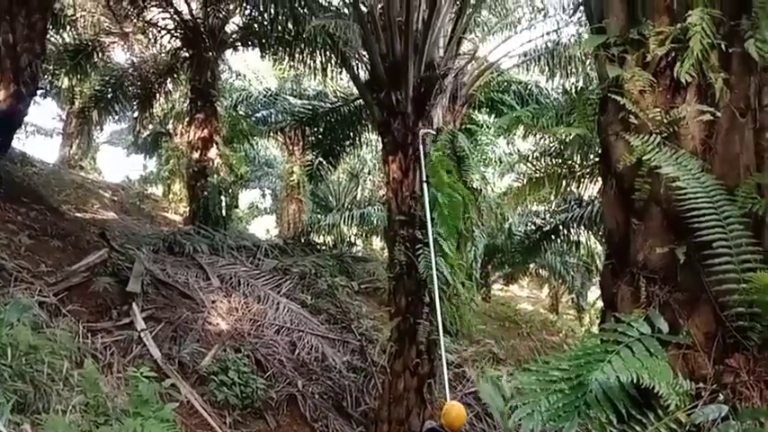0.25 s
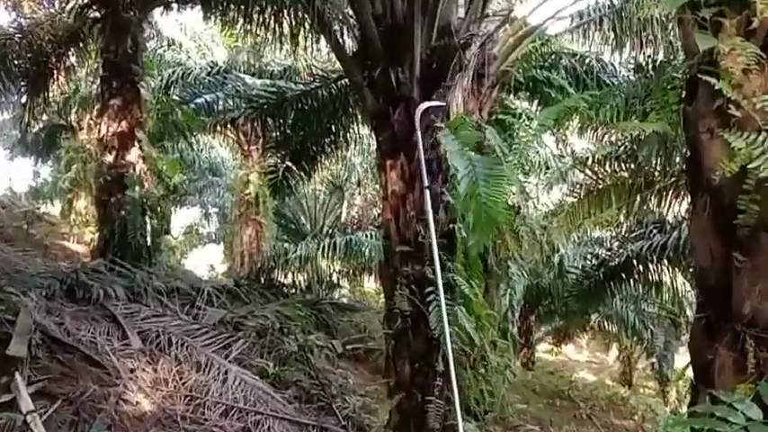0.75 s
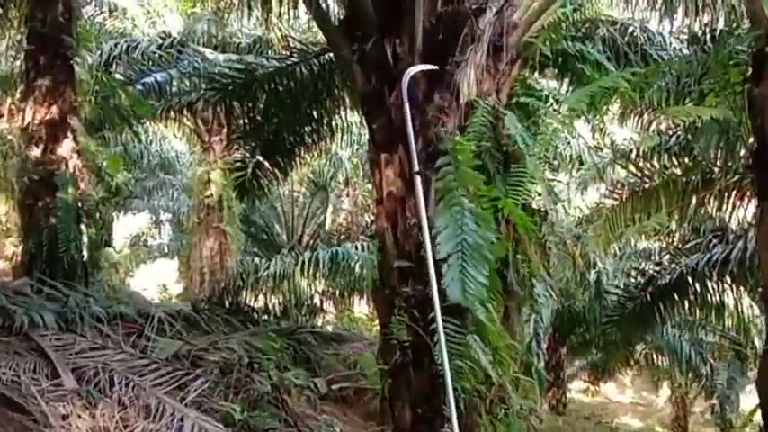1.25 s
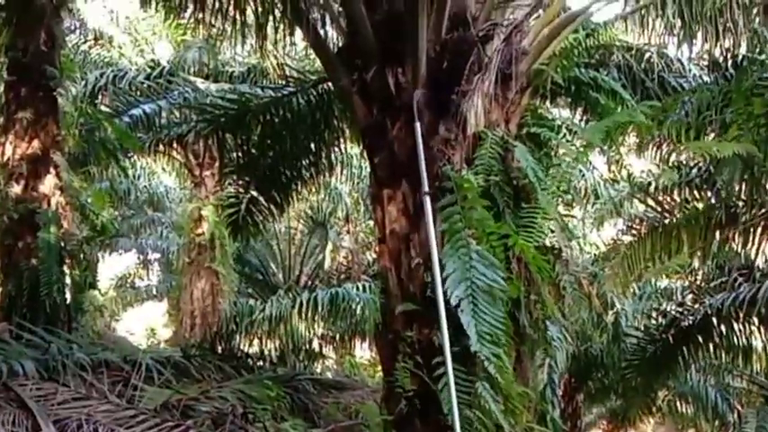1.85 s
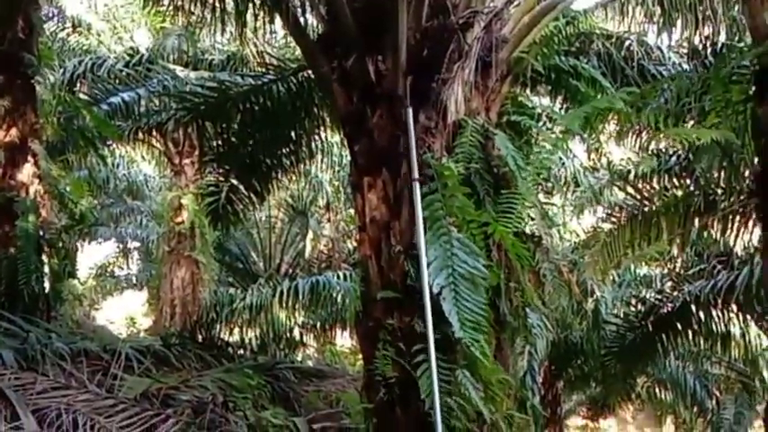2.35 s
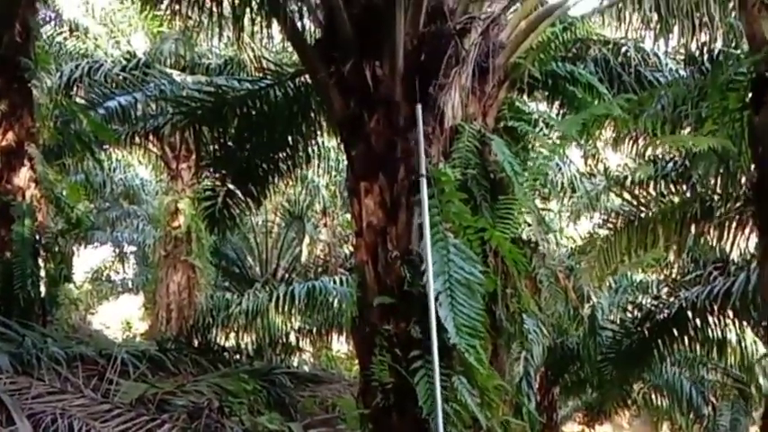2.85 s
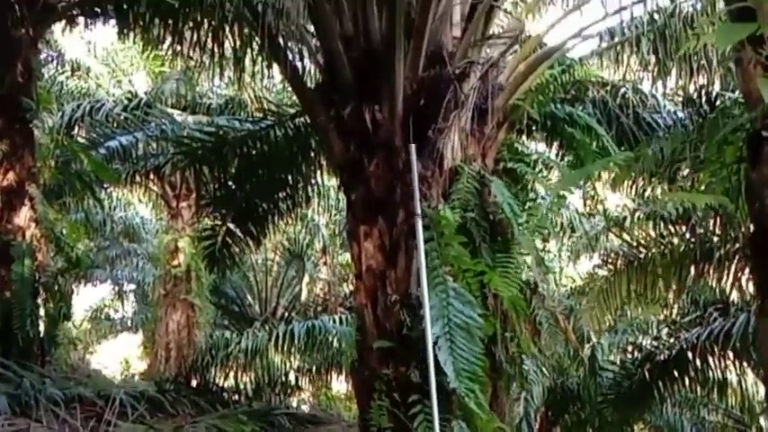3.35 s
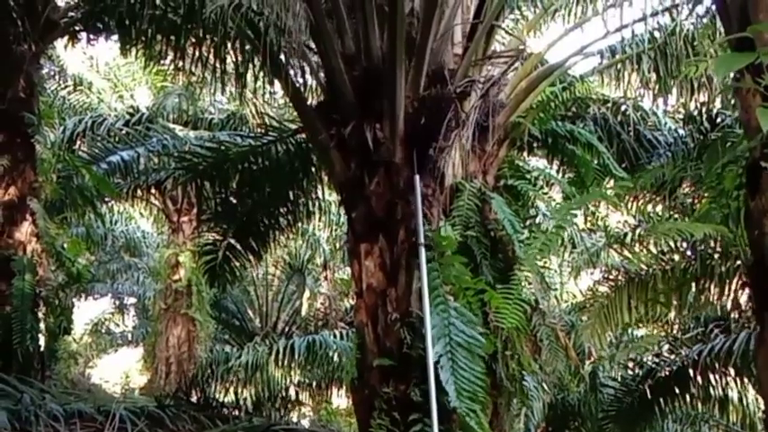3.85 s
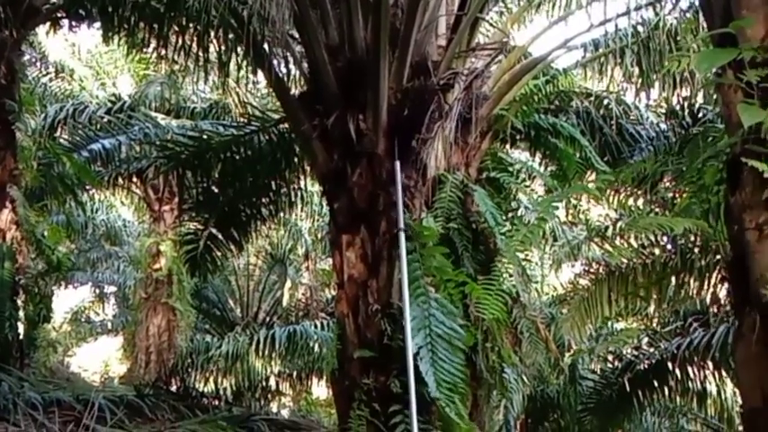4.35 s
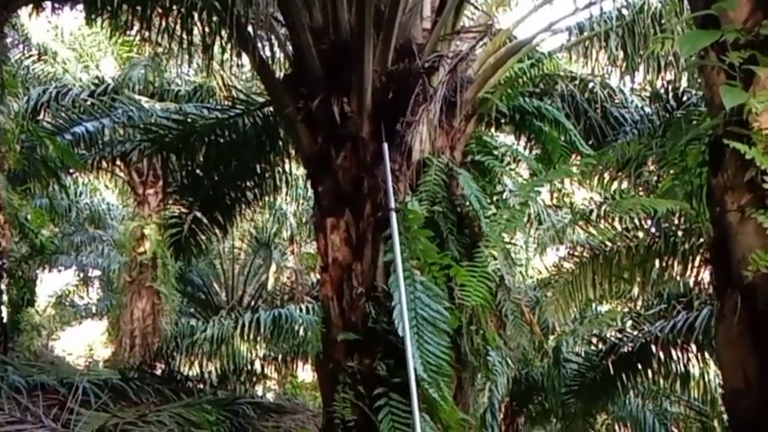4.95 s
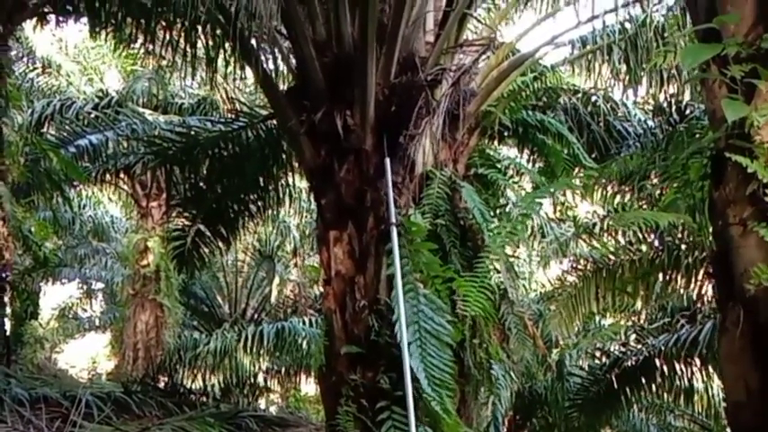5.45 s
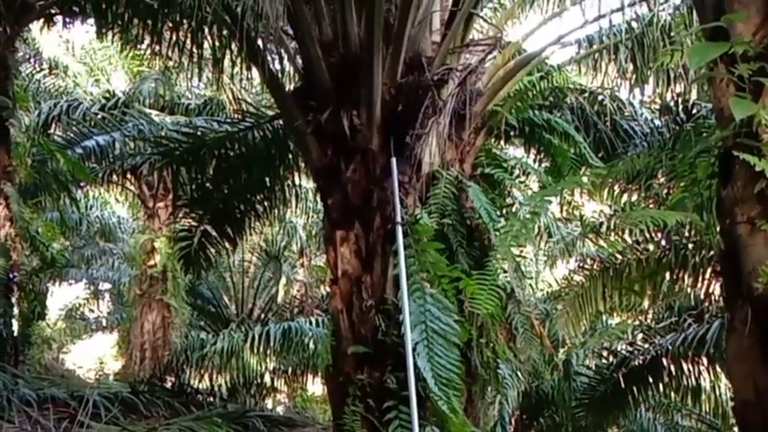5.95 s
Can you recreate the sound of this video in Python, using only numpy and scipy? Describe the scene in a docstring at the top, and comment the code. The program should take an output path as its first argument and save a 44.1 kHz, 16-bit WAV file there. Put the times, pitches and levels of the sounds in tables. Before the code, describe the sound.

Continuous bright insect noise surrounds a handheld microphone among palms: distant cicadas merged into a buzzing hiss, fast cricket trills and thin high rasping. Dry frond rustles open, fade into a lull, then resume irregularly with woody knocks and brittle snaps. A closer cicada pulses ever faster from the lull onward. Faint rumble lies below, the grove adds a short diffuse tail, and one last light rustle comes near the end.

```python
"""Throughout, clicks of buckling tymbals blur into the drone of two far cicada swarms over a faint rumble of
filtered noise; file-and-scraper crickets trill and a katydid's noise rasp fades in. At first someone's long
pole strokes dry palm fronds: fractures rustle, stalks knock as damped resonances, brushed leaves hiss. In the
lull that follows a gliding tone chirps (1.6 s) and a nearer cicada rises, throbbing ever faster. From 2.1 s
the strokes return, the rumble swells slightly near 2.5 s, leaflets snap as noise bursts; a stroke ends it."""
import sys
import numpy as np
from scipy import signal
from scipy.fft import rfft, irfft, next_fast_len
from scipy.io import wavfile
from scipy.ndimage import uniform_filter1d, map_coordinates

SR = 44100
rng = np.random.default_rng(int(sys.argv[2]) if len(sys.argv) > 2 else 0)


def generate_wav(sig):
    """Save sig (samples, or channels by samples) to the path in sys.argv[1] as 16-bit PCM at SR."""
    pcm = np.round(np.clip(np.atleast_2d(sig).T, -1, 1) * 32767).astype(np.int16)
    wavfile.write(sys.argv[1], SR, pcm)


N = 274302
T = np.arange(N) / SR  # time [s]

# Spectrum of the ground rumble: f/Hz, relative level/dB
RUMBLE_SPECTRUM = [(20, -5), (45, -13), (70, -11), (95, -3), (135, -1.5), (200, -6), (320, -12), (700, -17),
                   (1200, -12), (2500, -41)]
# Spectrum of brushed and swaying foliage: f/Hz, relative level/dB
FOLIAGE_SPECTRUM = [(300, -23), (600, -9), (1150, -7), (1450, 6), (2100, 0), (2800, -3.5), (3450, -1),
                    (4200, -6), (8000, -10.5), (10200, -5), (11200, -16), (15000, -1.5)]
# Level of the brushed-leaf hiss, which dies away early on: t/s, level/dB
FOLIAGE_LEVEL = [(0, -49), (.45, -62), (1.08, -70), (1.14, -63.5), (1.35, -63.5), (1.6, -71.5),
                 (2.2, -75.5), (6.2, -79)]
# Body resonance of the lower far cicadas: f/Hz, relative level/dB
LOW_SWARM_SPECTRUM = [(3900, -78), (4450, -40), (4680, -24.5), (4850, -12.5), (5100, -5.5), (5400, 1.5),
                      (5700, 0), (6050, -2.5), (6300, -14), (7000, -34.5), (8000, -82)]
# Body resonance of the higher far cicadas: f/Hz, relative level/dB
HIGH_SWARM_SPECTRUM = [(4500, -73.5), (5900, -9), (6400, -4), (6600, -3), (6850, 0.5), (7300, -4.5),
                       (7650, -15.5), (8000, -24.5), (8600, -34.5), (10300, -37), (11200, -50)]
# Level of the higher swarm: t/s, level/dB
HIGH_SWARM_LEVEL = [(0.1, -43.5), (1.39, -44), (1.92, -45.5), (2.5, -42.5), (3.78, -43.5), (6.1, -43.5)]
# Body resonance of the near cicada: f/Hz, relative level/dB
NEAR_CICADA_SPECTRUM = [(4000, -86), (4650, -33), (4850, -2.5), (5150, -1.5), (5400, 8.5), (5650, 3),
                        (6000, -14), (6400, -17), (7500, -68)]
# Effort of the near cicada, which joins in late: t/s, level at the top of a throb/dB
NEAR_CICADA_EFFORT = [(1.8, -58), (1.95, -44), (3.4, -46.5), (3.8, -41.5), (4.8, -39.5), (6.2, -42.5)]
# Pitches of two crickets, each taken a fifth of the way through a wing stroke: t/s, first f/Hz, second f/Hz
CRICKET_PITCHES = [(0, 6020, 5960), (1.5, 6170, 5950), (2.4, 6045, 5950), (3.1, 5950, 5930),
                   (3.7, 6010, 5950), (4.4, 6146, 5900), (5.2, 6086, 5885), (6.2, 6150, 5840)]
# Spectrum of the farther crickets' rasp: f/Hz, relative level/dB
FAR_CRICKET_SPECTRUM = [(11000, -40), (11450, -11.5), (11800, -9), (12200, 2.5), (12450, -15.5),
                        (12900, -24.5)]
# Spectrum of the katydid's rasp: f/Hz, relative level/dB
KATYDID_SPECTRUM = [(11500, -54), (12500, -13.5), (13200, -5.5), (13800, 2), (14200, -1), (14700, 3),
                    (15050, -13), (15500, -4)]
# Level of the katydid: t/s, level/dB
KATYDID_SWELL = [(.05, -68), (.38, -57.5), (1.75, -59), (1.85, -61), (1.95, -58.5), (3.8, -60), (4.95, -60),
                 (5.2, -63.5), (6.15, -62)]
# A lone short call: t/s, f at its middle/Hz, peak level/dB
LONE_CHIRP = [(1.568, 4745, -52)]
# Strokes through dry fronds: t of the crest/s, rise time/s, stalk level/dB, leaflet level/dB, tip level/dB
FROND_STROKES = [(.01, 0.016, -52, -65, -70), (0.082, 0.022, -51.5, -48, -71), (0.16, 0.039, -55, -57, -72),
                 (0.272, 0.058, -63, -62, -67), (0.434, .04, -70.5, -64, -62),
                 (0.758, 0.052, -60.5, -59, -60.5), (2.156, 0.022, -53.5, -62, -64),
                 (2.231, 0.011, -55, -67, -85), (2.376, 0.015, -66, -74, -79),
                 (2.548, 0.013, -59, -64, -61), (2.57, .009, -58, -44, -54), (2.669, 0.03, -54, -60.5, -67),
                 (2.939, 0.044, -60, -65.5, -70), (3.124, 0.041, -60, -56.5, -63),
                 (3.186, 0.02, -57.5, -49, -57.5), (3.294, 0.016, -70, -52, -63),
                 (3.361, 0.014, -63, -62, -65), (3.489, 0.034, -63.5, -61, -71),
                 (3.565, 0.018, -81, -63.5, -64), (3.71, 0.036, -57, -56, -66),
                 (3.846, .023, -53.5, -56.5, -66), (3.929, 0.012, -56, -54.5, -57),
                 (4.459, 0.022, -51, -51, -64), (4.581, 0.01, -55.5, -58, -72),
                 (4.649, 0.039, -54, -52, -63), (4.869, 0.026, -44.5, -49, -61.5),
                 (5.056, 0.037, -54, -52.5, -65), (5.645, .016, -69, -66.5, -88)]
# Spectrum of fracturing stalks: f/Hz, relative level/dB
STALK_SPECTRUM = [(200, -23), (380, -11.5), (520, -6), (620, -6), (760, 2), (900, 1), (1050, -6.5),
                  (1220, 3.5), (1450, 1.5), (2000, -37)]
# Spectrum of fracturing leaflets: f/Hz, relative level/dB
LEAFLET_SPECTRUM = [(900, -20), (1400, -6), (1650, -0.5), (1790, -3.5), (2000, 5), (2340, 2.5),
                    (2680, -4.5), (2920, -1.5), (3300, -11), (3650, -14), (4100, -20), (5600, -33)]
# Spectrum of the brittle leaflet tips: f/Hz, relative level/dB
TIP_SPECTRUM = [(3000, -46), (4400, 6.5), (5500, -10), (8500, 0.5), (10400, 5), (11300, -8), (15000, -27)]
# Modes of the long pole that the fronds scrape along: f/Hz, level/dB, t60/s
POLE_MODES = [(897, -5, .12), (1310, -13, 0.22), (2060, -4, 0.24), (2660, -17, 0.22), (3420, -5, .2)]
# The clearest knocks on stalks and ground: t/s, f/Hz, peak level/dB
STALK_KNOCKS = [(.15, 750, -57), (0.757, 1100, -44), (.785, 950, -51), (2.14, 424, -51), (2.165, 950, -48),
                (2.335, 119, -56), (2.567, 1642, -39), (2.59, 215, -49), (2.62, 120, -61.5),
                (2.935, 830, -50.5), (3.088, 900, -49), (3.203, 1180, -48), (3.287, 1300, -45),
                (3.303, 1200, -47), (3.35, 252.5, -53.5), (3.698, 900, -43.5), (3.838, 772, -44.5),
                (4.403, 900, -50.5), (4.435, 900, -41.5), (4.459, 850, -39), (4.468, 409.6, -48.5),
                (4.495, 240, -57), (4.59, 2350, -48.5), (4.867, 426, -46), (4.887, 218, -53.5),
                (4.999, 800, -44), (5.054, 2053, -43.5), (5.085, 229, -56), (5.64, 1100, -56.5)]
# Leaflets breaking: t/s, level at the onset/dB
LEAFLET_SNAPS = [(2.562, -43), (3.127, -49), (3.171, -35.5), (3.198, -38), (3.576, -63), (3.824, -60),
                 (3.923, -58)]
# Spectrum of a breaking leaflet: f/Hz, relative level/dB
SNAP_SPECTRUM = [(900, -33), (2000, -26), (3600, -8), (5500, 8.5), (8000, -6), (10500, -14.0),
                 (12000, -14), (15000, -22)]

# The rumble swells while the weight shifts: resting level, rise [dB]; moment, width [s]
RUMBLE_DB, RUMBLE_RISE_DB, RUMBLE_PEAK_S, RUMBLE_SPAN_S = -81, 3, 2.5, .45
LOW_SWARM_DB = -39  # the lower swarm has no slow level curve
# One crest [s], throbs a second there, gain in rate a second; share of amplitude lost between throbs
THROB_AT_S, THROB_RATE, THROB_SPEEDUP, THROB_DEPTH = 3.94, 5.337, .279, 0.78
RASP_START_DB, RASP_FADE_DB_PER_S = -66.5, 0.34  # the crickets' overtones
FALL_RATIO, FALL_SHAPE = 1.18, 1.33  # a stroke's release over its rise; shape 1 is exponential
SWAY_DB, SWAY_S = -4, 0.034  # swaying foliage: level over the tips', time to settle
# Contact time [s] at a reference pitch [Hz]; lower, heavier parts stay in touch longer
CONTACT_S, CONTACT_HZ, CONTACT_LAW = 0.0084, 895, 0.3
SNAP_T60_S = .017
TOP_HZ = 15520


def amp(db):
    """Logarithmic level: decibels to amplitude gain."""
    return 10 ** (np.asarray(db) / 20)


def unit(x):
    """Power normalisation: scale to rms 1."""
    return x / np.sqrt(np.mean(x ** 2) + 1e-20)


def curves(rows):
    """Linear interpolation: one value per sample for each column after the time."""
    s, *cols = np.transpose(rows)
    return [np.interp(T, s, c) for c in cols]


def wobble(rate):
    """Slow random fluctuation: a smooth curve through rate random knots a second."""
    knots = rng.standard_normal(int(N * rate / SR) + 4)
    return map_coordinates(knots, [T * rate])


def filtered(x, response):
    """Linear filtering: the spectrum of x times a response of frequency."""
    size = next_fast_len(N + SR // 2)
    spectrum = rfft(x, size) * response(np.fft.rfftfreq(size, 1 / SR))
    return irfft(spectrum, size)[:N]


def coloured(x, spectrum):
    """Spectral shaping: x through points of (f/Hz, level/dB), at rms 1."""
    f, db = np.transpose(spectrum)

    def response(hz):
        return amp(np.interp(np.log(hz + 1), np.log(f), db, left=-120))
    return unit(filtered(x, response))


def cycles(rate, drift):
    """Phase accumulation: cycles counted by an oscillator whose rate drifts slightly."""
    return np.cumsum(rate * (1 + drift * wobble(4))) / SR + rng.random()


def swell(t, rise, fall, shape):
    """Transient envelope: a rounded rise to 1 at t = 0, then a stretched-exponential release."""
    return np.where(t < 0, np.exp(-(t / rise) ** 2), np.exp(-np.abs(t / fall) ** shape))


def grove(x, wet_db, t60):
    """Diffuse scattering: direct sound plus a decaying noise tail from trunks and crowns."""
    t = T[:SR // 2]
    tail = rng.standard_normal(len(t)) * amp(-60 * t / t60)
    return x + amp(wet_db) * signal.fftconvolve(x, tail / np.linalg.norm(tail))[:N]


def crackle(spectrum, density):
    """Poisson-like impulse noise: dry clicks of uneven size at random moments, density a second."""
    clicks = (rng.random(N) < density / SR) * rng.standard_normal(N)
    return coloured(clicks, spectrum)


def air():
    """Broadband noise: a faint low rumble throughout and the impulsive hiss of brushed foliage."""
    leaf_db, = curves(FOLIAGE_LEVEL)
    rumble_db = RUMBLE_DB + RUMBLE_RISE_DB * np.exp(-((T - RUMBLE_PEAK_S) / RUMBLE_SPAN_S) ** 2)
    rumble = amp(rumble_db + 2.0 * wobble(15)) * coloured(rng.standard_normal(N), RUMBLE_SPECTRUM)
    hiss = amp(leaf_db + 1.0 * wobble(45)) * crackle(FOLIAGE_SPECTRUM, density=9000)
    return rumble + hiss


def tymbals(click_rate, count):
    """Snap-through buckling: each cicada clicks at its own rate and with uneven force."""
    clicks = np.zeros(N)
    for _ in range(count):
        own_rate = click_rate * np.exp(.3 * rng.standard_normal())
        turns = np.floor(cycles(own_rate, drift=.04))
        clicks += np.diff(turns, prepend=turns[0]) * rng.standard_normal(N)
    return unit(clicks)


def swarm(song, click_rate, blur_db, count):
    """Source and resonator: clicks ring the insects' bodies; distance smears much of them into hiss."""
    blur = amp(blur_db) * rng.standard_normal(N)
    return coloured(tymbals(click_rate, count=count) + blur, song)


def far_cicadas():
    """Incoherent superposition: many singers of two kinds merge into a drone."""
    high_db, = curves(HIGH_SWARM_LEVEL)
    low = swarm(LOW_SWARM_SPECTRUM, click_rate=190, blur_db=6.0, count=12)
    high = swarm(HIGH_SWARM_SPECTRUM, click_rate=140, blur_db=4.0, count=12)
    return amp(LOW_SWARM_DB + 0.1 * wobble(8)) * low + amp(high_db + 0.24 * wobble(7.5)) * high


def throbbing():
    """Amplitude modulation: the near cicada's effort times a throb that slowly quickens."""
    effort_db, = curves(NEAR_CICADA_EFFORT)
    t = T - THROB_AT_S
    turns = THROB_RATE * t + THROB_SPEEDUP * t ** 2 / 2
    throb = 1 - THROB_DEPTH * np.sin(np.pi * turns) ** 2
    return amp(effort_db + 0.77 * wobble(6.6)) * throb


def near_cicada():
    """Nested modulation: a tymbal song with a fast buzz inside the slow throb."""
    buzz = 1 + 0.45 * np.cos(2 * np.pi * cycles(78, drift=0.019))
    # two click trains build the one voice
    song = swarm(NEAR_CICADA_SPECTRUM, click_rate=390, blur_db=0.5, count=2)
    return throbbing() * unit(buzz * song)


def cricket(pitch_hz, trill_rate, tone_db, octave_db):
    """Stridulation: wing strokes in a quick trill; pitch sags within each and carries an octave."""
    stroke = cycles(trill_rate, drift=0.0039) % 1
    opening = np.sin(np.pi * np.clip(stroke / 0.38, 0, 1)) ** 2
    hz = pitch_hz * (1 - .04 * (stroke - .2) + 0.00205 * wobble(500))
    phase = 2 * np.pi * np.cumsum(hz) / SR
    tone = unit(grove(opening * np.sin(phase), wet_db=7, t60=0.59))
    octave = unit(grove(opening * np.sin(2 * phase), wet_db=5.5, t60=0.43))
    return amp(tone_db) * tone + amp(octave_db) * octave


def crickets():
    """Superposed tone and noise: two near crickets over the high rasp of farther ones."""
    first_hz, second_hz = curves(CRICKET_PITCHES)
    rasp_db = RASP_START_DB - RASP_FADE_DB_PER_S * T
    first = cricket(first_hz, 13.2, tone_db=-48.5, octave_db=rasp_db - 5.0)
    second = cricket(second_hz, 13.4, tone_db=-51, octave_db=rasp_db - 4.5)
    rasp = amp(rasp_db) * coloured(rng.standard_normal(N), FAR_CRICKET_SPECTRUM)
    return first + second + rasp


def katydid():
    """Modulated noise: a very high rasp, pulsing slightly with every pass of the file."""
    db, = curves(KATYDID_SWELL)
    file_pass = 1 + 0.078 * np.cos(2 * np.pi * cycles(20.7, drift=0.018))
    pulse = file_pass * amp(0.79 * wobble(12))
    return amp(db) * unit(pulse * coloured(rng.standard_normal(N), KATYDID_SPECTRUM))


def chirp():
    """Frequency glide: one brief falling note under a Gaussian envelope."""
    s, hz, db = LONE_CHIRP[0]
    glide = np.clip((T - s) / 0.0138, -4, 4)
    phase = 2 * np.pi * np.cumsum(hz * (1 - 0.0099 * glide)) / SR
    return amp(db) * np.exp(-glide ** 2) * np.sin(phase)


def crunch(spectrum, density, ring_s, click_db):
    """Fracture excitation: small breaks each ring a piece of its own pitch, among finer crackle."""
    count = int(density * N / SR)
    when, pitch, force = rng.random((count, 3)).T
    t = T[:SR // 30]
    hz = spectrum[0][0] + pitch * (spectrum[-1][0] - spectrum[0][0])
    start = (when * N).astype(int)
    envelope = np.exp(-t / ring_s) * (1 - np.exp(-t / 0.0029))
    rings = (.5 + force[:, None]) * np.sin(2 * np.pi * hz[:, None] * t) * envelope
    # add every ring at its own start
    places = start[:, None] + np.arange(len(t))
    ringing = np.bincount(places.ravel(), rings.ravel(), N)[:N]
    return unit(coloured(ringing, spectrum) + amp(click_db) * crackle(spectrum, density=1800))


def rustles():
    """Power addition: strokes swell and die in stalks, leaflets and brittle tips, then foliage sways."""
    power = np.zeros((4, N))
    for s, length, stalk_db, leaflet_db, tip_db in FROND_STROKES:
        push = swell(T - s, length, FALL_RATIO * length, FALL_SHAPE)
        settling = swell(T - s, length, SWAY_S, 0.82)
        power[:3] += (amp([[stalk_db], [leaflet_db], [tip_db]]) * push) ** 2
        power[3] += (amp(tip_db + SWAY_DB) * settling) ** 2
    stalk, leaflet, tip, sway = np.sqrt(power)
    return (stalk * crunch(STALK_SPECTRUM, density=340, ring_s=0.01, click_db=-13.0)
            + leaflet * crunch(LEAFLET_SPECTRUM, density=560, ring_s=0.012, click_db=-5)
            + tip * crackle(TIP_SPECTRUM, density=3800)
            + sway * crackle(FOLIAGE_SPECTRUM, density=14000))


def pole(x):
    """Modal resonance: what the pole rings with when x shakes it."""
    def response(f):
        total = 0
        for hz, db, t60 in POLE_MODES:
            width = np.log(1000) / (np.pi * t60)  # bandwidth [Hz]
            total = total + amp(db) * 1j * f * width / (hz * hz - f * f + 1j * f * width)
        return total
    return filtered(x, response)


def knocks():
    """Damped oscillation: soft contacts sound one unsteady, sinking resonance each."""
    out = np.zeros(N)
    t = T[:SR // 5] - T[SR // 20]  # begins ahead of the crest to hold the rise
    for s, hz, db in STALK_KNOCKS:
        contact = CONTACT_S * (CONTACT_HZ / hz) ** CONTACT_LAW
        unrest = unit(uniform_filter1d(rng.standard_normal(len(t)), size=160))
        pitch = hz * (1 - 0.0665 * np.tanh(t / contact) + 0.0627 * unrest)
        tone = np.sin(2 * np.pi * np.cumsum(pitch) / SR)
        start = round((s + t[0]) * SR)
        out[start:start + len(t)] += amp(db) * swell(t, contact, 0.96 * contact, 1) * tone
    return out


def snaps():
    """Impulsive fracture: a dry leaflet breaks with a short bright burst of decaying noise."""
    decay = np.zeros(N)
    for s, db in LEAFLET_SNAPS:
        decay += amp(db - 60 * np.abs(T - s) / SNAP_T60_S) * (T >= s)
    return decay * coloured(rng.standard_normal(N), SNAP_SPECTRUM)


def fronds():
    """Excitation, resonance and scattering: a pole pushed through dry fronds, heard in the grove."""
    scraping = rustles()
    return grove(scraping + pole(scraping) + knocks() + snaps(), wet_db=-11.0, t60=0.33)


def scene():
    """Linear superposition: air, insects and fronds add; both channels carry the same sound."""
    insects = far_cicadas() + near_cicada() + crickets() + katydid() + chirp()
    return np.tile(air() + insects + fronds(), (2, 1))


def record(dry):
    """Band limitation: the recorder keeps nothing above its top frequency."""
    return np.array([filtered(channel, lambda hz: hz < TOP_HZ) for channel in dry])


dry = scene()
out = record(dry)
generate_wav(out)
```